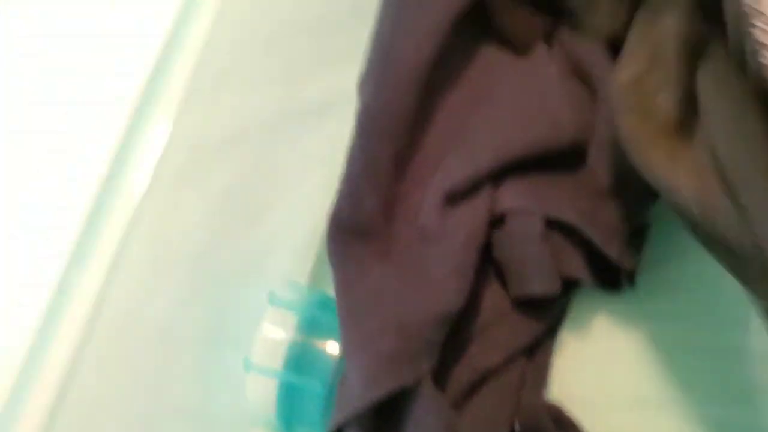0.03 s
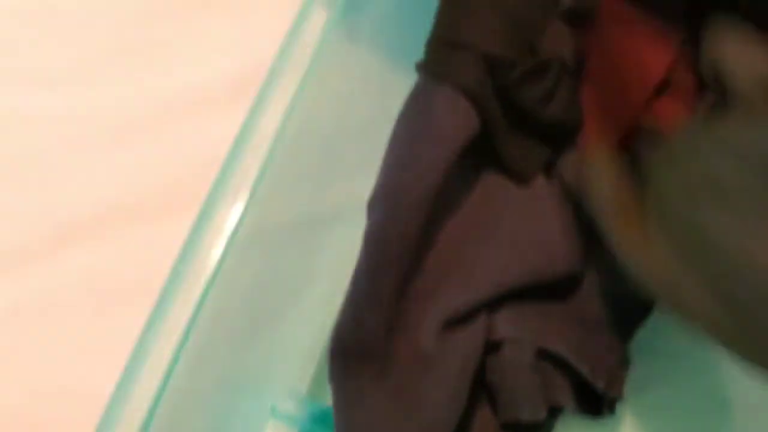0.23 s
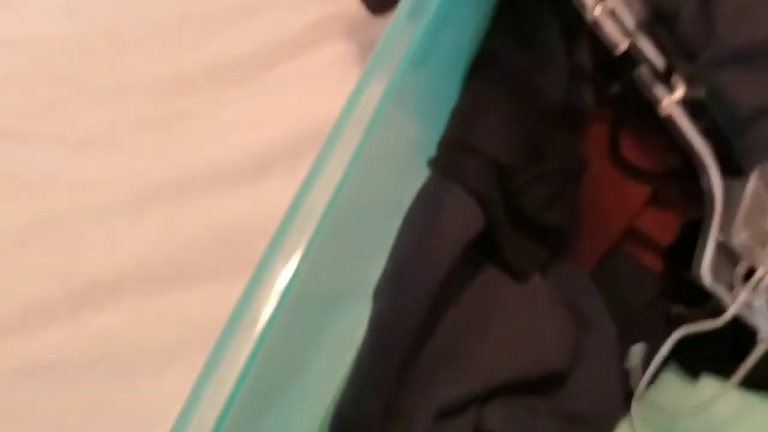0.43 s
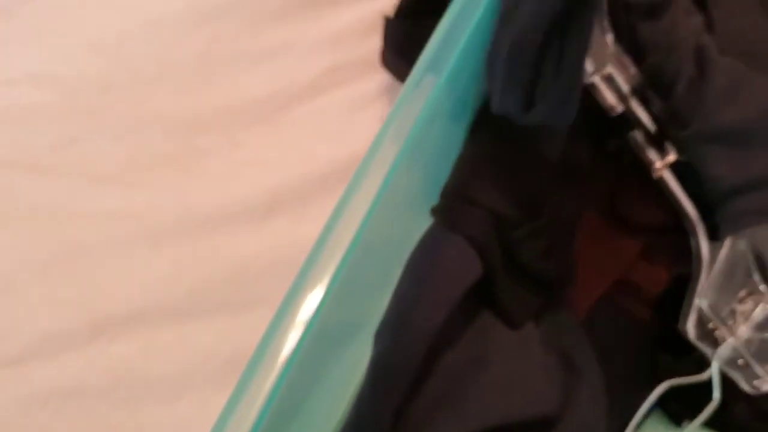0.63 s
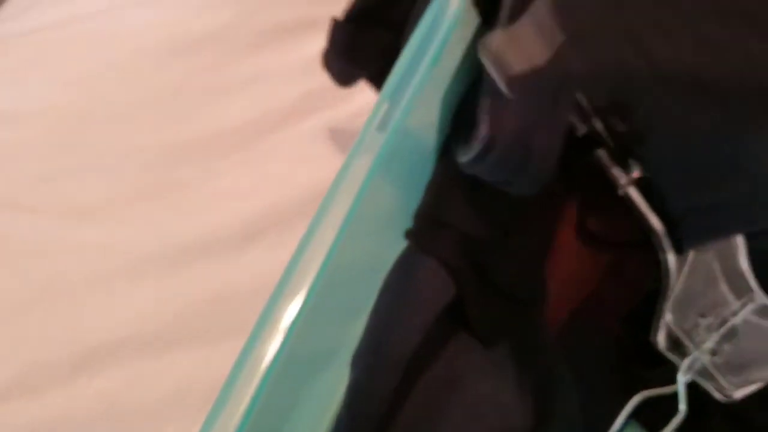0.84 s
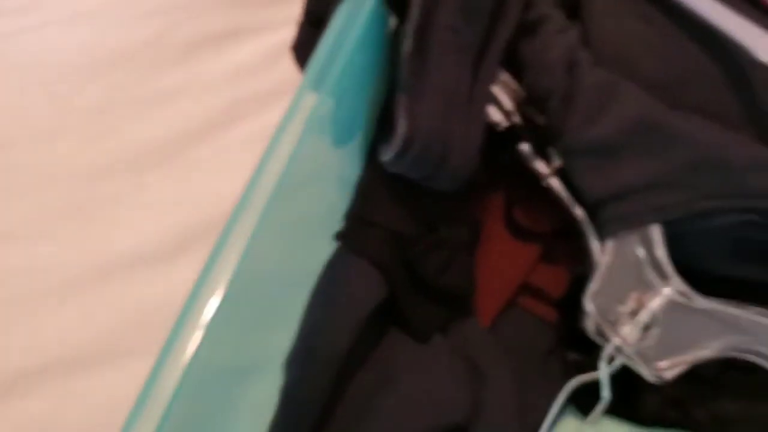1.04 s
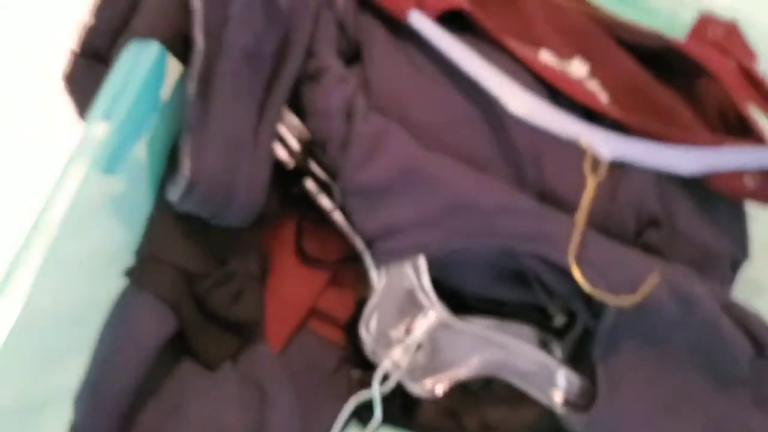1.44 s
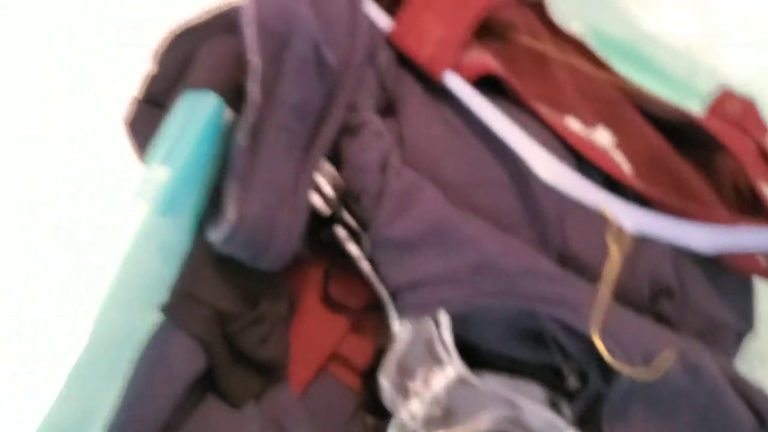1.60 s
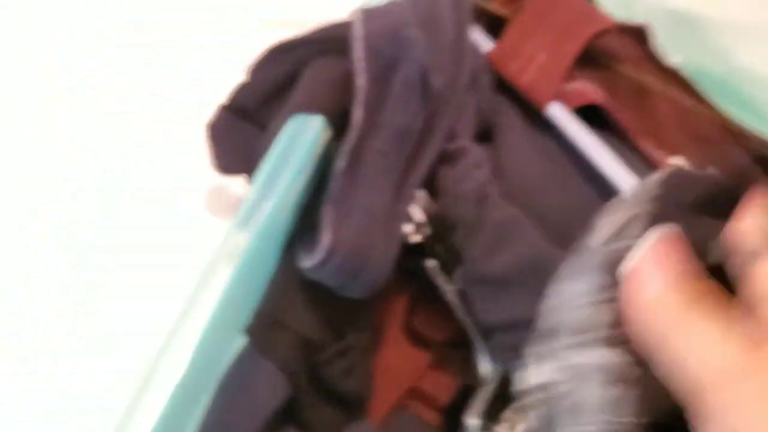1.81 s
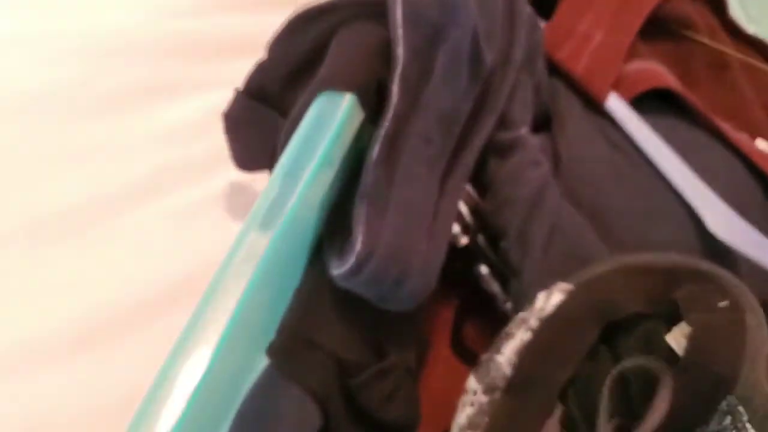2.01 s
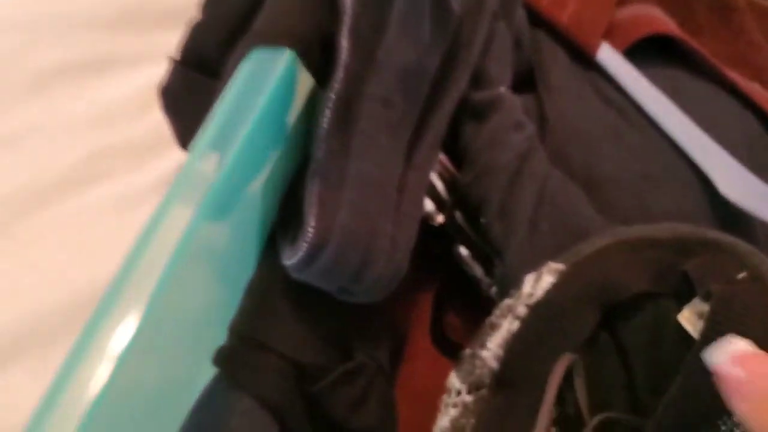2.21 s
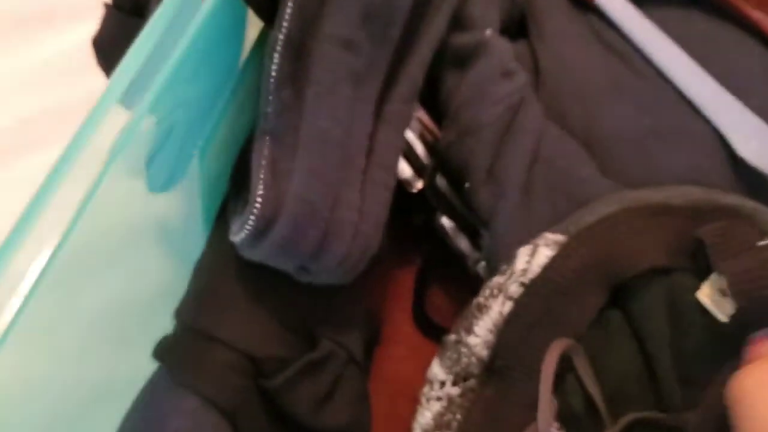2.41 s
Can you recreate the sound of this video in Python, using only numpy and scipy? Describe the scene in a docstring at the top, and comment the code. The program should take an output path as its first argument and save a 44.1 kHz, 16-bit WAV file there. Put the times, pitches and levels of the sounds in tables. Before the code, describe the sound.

Plastic clothes hangers clack and knock against a plastic storage bin, with soft fabric rustling.

```python
"""A quiet room, a stereo pair close to a plastic storage bin, where clothes on hangers are shifted about.
A hook squeaks as it sticks and slips; plastic hangers scrape, snap free and clack together, and their
wire hooks sing on faintly. Struck or bumped, the bin answers with hollow knocks and a thump of its wall.
Fabric rustles softly in between, over a low room hum. The treble sits a little to the left."""
import sys
import numpy as np
from scipy import signal
from scipy.fft import rfft, irfft, next_fast_len
from scipy.io import wavfile
from scipy.ndimage import map_coordinates

SR = 44100
rng = np.random.default_rng(int(sys.argv[2]) if len(sys.argv) > 2 else 0)


def transcribe(u):
    """Save the signal u as a 16-bit wav file named by the first command-line argument.

    u: samples, shape (n,) or (channels, n), limited to [-1, 1]; the rate is SR.
    q: integer samples, one column per channel.
    """
    v = np.clip(np.atleast_2d(u).T, -1, 1)
    q = np.round(v * 32767).astype(np.int16)
    wavfile.write(sys.argv[1], SR, q)


N = 112454
NOW = np.arange(N) / SR  # seconds into the scene
T = np.arange(2 ** 15) / SR  # seconds into one event

# The room's decay. Each row: frequency in Hz, t60 in seconds.
ROOM_DECAY = [(100, .45), (350, .42), (650, 0.78), (1300, 0.29), (2700, 0.38), (6000, 0.18), (14000, 0.18)]
# How alike the two microphones hear noise. Each row: frequency in Hz, correlation.
MIC_LIKENESS = [(35, .7), (120, .96), (400, .94), (900, 0), (2000, .2), (6000, 0), (15000, 0.017)]
# Loudness of the hum with handling rumble, and of dragged cloth. Each row: time in seconds, level in dB.
RUMBLE_LEVEL = [(0, -59.5), (.3, -55.5), (.85, -62.5), (.98, -63.5), (1.25, -62.5), (1.5, -67.5),
                (1.78, -58), (2.1, -57.5), (2.55, -56.5)]
DRAG_LEVEL = [(0, -66), (.09, -65), (.14, -64.5), (.18, -64), (.36, -56.5), (.6, -66.5), (.88, -79),
              (.98, -85), (2.55, -77.5)]

# The colour of each noise. Each row: frequency in Hz, relative spectral level in dB.
RUMBLE_SPECTRUM = [(12, -48), (20, -8.5), (60, 1.5), (86, -7.5), (116, -7.5), (198, -11.5), (216, -18.5),
                   (347, -21), (422, -37), (513, -24), (825, -45), (2530, -37.5), (5230, -40), (12400, -31),
                   (16000, -43.5)]
HISS_SPECTRUM = [(300, 7.5), (1300, -1), (1900, 0), (2500, 13), (3200, -3), (6000, -7.5),
                 (10000, 3), (15500, -14)]
DRAG_SPECTRUM = [(200, -2), (800, -6), (1500, -2), (2700, 7), (4200, 4.5), (6500, 2), (10000, 2),
                 (15000, 1.5)]
SWISH_SPECTRUM = [(300, -15), (1500, -7), (2500, -2), (4000, -4.5), (7000, -0.5), (10000, 2.5), (15500, -9)]
SLIDE_SPECTRUM = [(1000, -38), (2000, -31.5), (2500, -10.5), (2850, -3.5), (3300, -18), (3900, -10),
                  (4250, 1), (4700, -5.5), (5300, -13.5), (9000, -17.5), (15000, -24.5)]
BUMP_SPECTRUM = [(60, 3.5), (220, 8.5), (450, 2.5), (900, -5), (1400, -9), (3000, -6), (10000, -36.5)]
KNOCK_SPECTRUM = [(60, -28), (250, 2), (650, 1.5), (900, -12.5), (1400, -2.5), (1800, -8), (2800, -4.5),
                  (5000, -15.5), (9000, -19), (15000, -21)]
SQUEAK_SPECTRUM = [(200, -16), (800, -27.5), (1500, -20.5), (2800, -2), (5000, -1), (7000, -4.5),
                   (8500, -0.5), (12000, -13), (15500, -21.5)]
SCRAPE_SPECTRUM = [(200, -18.5), (700, -8), (1500, -1.5), (2600, -4.5), (5000, 1.5), (6500, -11.5),
                   (11000, -19.5), (15000, -25)]
SNAP_SPECTRUM = [(200, -5.5), (800, 1.5), (1800, -5.5), (3300, -9), (5000, 3.5), (9000, -3.5), (12000, 1.5),
                 (14500, 2.5), (16000, -11)]
CLACK_SPECTRUM = [(200, 5.5), (1000, -21), (1900, -17), (2700, -1.5), (4000, -1.5), (5000, -16),
                  (9000, -19.5), (15000, -38)]

# How the parts ring. Each row: frequency in Hz, relative level in dB, t60 in seconds.
BIN_MODES = [(182, -28, .2), (243, -15, .09), (448, -27, .09), (546, -30, .09), (595, -26, .09),
             (643, -22, .1), (686, -27, .1), (738, -26, .1), (1275, -20, .022), (1435, -20, .022),
             (2105, -23, .025)]
WIRE_MODES = [(547, -42.5, 1), (734, -47, 0.8), (983, -47, 0.89), (1955, -52.5, 1.9), (2500, -53.5, 2.3),
              (3950, -47.5, 1.6), (4420, -51.5, 1.6)]
HOOK_MODES = [(222, -20.5, .3), (546.8, -33.5, .8), (800, -42.5, .8), (1100, -34.5, .6), (2824, 0.5, .22),
              (2886, 0.5, .18), (2855, -11, .2), (4540, -7, .25), (5260, -19.5, .15), (5690, -15.5, .25),
              (8115, -13.5, .17), (8500, -16.5, .2), (9510, -20, .15)]
EDGE_MODES = [(2300, -13.5, .03), (2720, -6.5, .03), (3680, -6, .03), (4190, 0, 0.04), (5220, -10.5, .03)]
SNAP_MODES = [(2650, -19, .05), (3150, -15, .05), (3474, -7, .05), (3992, -6, .045), (5292, -12, .04),
              (6002, -12, .04), (7850, -14, .035), (9679, -13, .03), (10500, -16, .025), (12800, -16, .025),
              (13660, -11, .025), (14200, -10, .025), (14900, -14, .025)]
CLACK_MODES = [(2704, -6, 0.034), (2870, -32, 0.021), (3010, -39, .04), (3250, -16, 0.051),
               (3510, -10.5, 0.032), (4180, -24, 0.099), (6250, -7, 0.013)]

# Light strokes of fabric, and a hook sliding over cloth or plastic. Each row: middle in seconds, half width in
# seconds, level in dB.
FABRIC_STROKES = [(.87, .06, -80.5), (1.14, 0.052, -77), (1.26, 0.035, -83), (1.539, .05, -74),
                  (1.68, 0.074, -71), (1.818, 0.017, -63), (1.889, 0.097, -67), (2.245, 0.057, -72),
                  (2.49, 0.17, -91)]
HOOK_SLIDES = [(.02, 0.088, -70.5), (.13, 0.021, -51), (1.85, 0.019, -60), (2.12, 0.3, -79)]
# The bin wall bulges under the load. Each row: middle in seconds, level in dB, frequency in Hz.
WALL_FLEXES = [(0.341, -34, 65.7), (2.269, -31, 59)]
# Hard knocks on the bin, and soft bumps of clothes against it.
# Each row: start in seconds, level in dB, treble cutoff in Hz, wall thump in dB, thump pitch in Hz.
BIN_KNOCKS = [(0.401, -4.5, 15880, -23, 95.9), (0.4215, -6.5, 12000, -22.5, 86.9),
              (.461, -17, 14000, -33.5, 81.4), (1.865, -19.5, 550, -35, 87.7), (1.956, -33, 3270, -51, 180),
              (2.240, -48.5, 2000, -51, 109.9), (2.2795, -10, 2940, -25.5, 84.5)]
BIN_BUMPS = [(.670, -35.5, 800, -37.5, 83), (.698, -41, 1400, -46.5, 100), (1.091, -47.5, 600, -44, 109.9),
             (1.098, -44, 650, -44, 210.4), (1.117, -49.5, 700, -45.5, 144),
             (1.8862, -29.5, 386, -50, 107.5), (2.432, -45, 467, -65, 83)]
# A hook or a plastic edge rubs over plastic. Each row: start in seconds, length in seconds, level in dB.
HOOK_SQUEAKS = [(.2062, 0.0065, -12.5), (.2135, .015, -16)]
EDGE_SCRAPES = [(.3435, .013, -39), (.3765, 0.021, -26.5), (.405, 0.012, -25.5)]
# Contacts among the hangers. Each row: start in seconds, level in dB.
PILE_JOSTLES = [(.404, -28)]
HANGER_SNAPS = [(0.4074, -29.5), (0.4199, -26), (0.4803, -5)]
HANGER_CLACKS = [(1.848, -37), (1.8661, -14), (1.956, -34)]
CLIP_TICKS = [(1.805, -43), (1.815, -55), (1.826, -50), (1.889, -43.5), (2.2798, -37), (2.428, -60),
              (2.484, -58.5)]


def amp(db):
    return 10 ** (np.asarray(db) / 20)


def unit_rms(x):
    return x / np.sqrt(np.mean(x ** 2) + 1e-20)


def fade(t, t60):
    """Falls by 60 dB in t60 seconds."""
    return np.exp(-np.log(1000) * t / max(t60, 1e-4))


def along(points, hz):
    """Interpolates (Hz, value) points on a log frequency axis."""
    freqs, values = np.transpose(points)
    return np.interp(np.log(hz + 1), np.log(freqs + 1), values)


def filtered(x, response):
    """Shapes x by a gain that depends on frequency."""
    size = x.shape[-1]
    padded = next_fast_len(size + SR // 4)
    return irfft(rfft(x, padded) * response(np.fft.rfftfreq(padded, 1 / SR)), padded)[..., :size]


def noise(spectrum, size=len(T)):
    """Noise of rms 1 at the two microphones: alike in the bass, unrelated in the treble."""
    def mid_side_gains(hz):
        angle = np.arccos(np.clip(along(MIC_LIKENESS, hz), -1, 1)) / 2
        return amp(along(spectrum, hz)) * [np.cos(angle), np.sin(angle)]
    mid, side = filtered(rng.standard_normal((2, size)), mid_side_gains)
    return unit_rms(np.array([mid + side, mid - side]))


def wobble(rate, size=len(T)):
    """A smooth random curve, rate knots a second."""
    return map_coordinates(rng.standard_normal(size // 8), [np.arange(size) * rate / SR], mode="wrap")


def pulse(spectrum):
    """One minimum-phase click of peak 1 with this spectrum."""
    cepstrum = irfft(along(spectrum, np.fft.rfftfreq(len(T), 1 / SR)) * np.log(10) / 20)
    cepstrum[1:len(T) // 2] *= 2
    cepstrum[len(T) // 2:] = 0
    click = irfft(np.exp(rfft(cepstrum)))
    return click / np.abs(click).max()


def tone(hz, drift=0, lag_s=7e-5):
    """A mode at both microphones; it reaches the left one slightly later."""
    return np.sin(2 * np.pi * hz * (T - np.array([[lag_s], [0]])) + drift)


def ring(modes, chatter_rad, chatter_hz):
    """Free ringing, a little different at each blow; loose parts chatter and blur the pitches."""
    return sum(amp(db + rng.normal(0, 1.5)) * fade(T, t60) * tone(hz, chatter_rad * wobble(chatter_hz))
               for hz, db, t60 in modes)


def swells(rows):
    """Smooth strokes that rise and fall."""
    return sum(amp(db) * np.exp(-((NOW - s) / width) ** 2) for s, width, db in rows)


def add(out, start_s, x):
    i = round(start_s * SR)
    out[:, i:i + len(T)] += x[:, :N - i]


def at_mics(x, left_db, wet_db):
    """Close up, the treble favours the left microphone; the room answers, its treble dying first."""
    tilt_db = np.array([[.5], [-.5]]) * left_db
    direct = filtered(x, lambda hz: amp(tilt_db * hz ** 2 / (hz ** 2 + 900 ** 2)))
    hz, t, bands = signal.stft(noise([(100, 0.0069), (15000, 0)]), SR, nperseg=256)
    decay = np.exp(-np.log(1000) * t / along(ROOM_DECAY, hz)[:, None])
    tail = signal.istft(bands * decay, SR, nperseg=256)[1][:, :len(T)] * (1 - fade(T, 0.057))
    reverb = signal.fftconvolve(direct, tail / np.linalg.norm(tail[0]), axes=1)[:, :N]
    return direct + amp(wet_db) * reverb


def room_tone(hum_hz=117.8, hiss_db=-84):
    """Behind everything: low rumble with a wavering hum line, and faint hiss."""
    hum = np.sin(2 * np.pi * hum_hz * NOW + .7 * wobble(27, N))
    rumble = filtered(noise(RUMBLE_SPECTRUM, N), lambda hz: 1 / (1 + (hz / 900) ** 4))
    level = amp(np.interp(NOW, *np.transpose(RUMBLE_LEVEL)))
    return level * (rumble + hum) + amp(hiss_db) * noise(HISS_SPECTRUM, N)


def fabric(grain_db=2):
    """Cloth drags over the bin and brushes against itself in fine grains, taking hooks along."""
    drag = amp(np.interp(NOW, *np.transpose(DRAG_LEVEL))) * noise(DRAG_SPECTRUM, N)
    strokes = swells(FABRIC_STROKES) * noise(SWISH_SPECTRUM, N)
    slides = swells(HOOK_SLIDES) * noise(SLIDE_SPECTRUM, N)
    grain = amp(grain_db * wobble(300, N))
    return at_mics((drag + strokes + slides) * grain, left_db=3, wet_db=-13.5)


def wire_hooks(snap_db=-12, clack_db=-5, blur_rad=2.5):
    """Many loose hooks shiver after the hangers strike, each pitch a blurred cluster."""
    out = np.zeros((2, N))
    fade_out = 1 - fade(T[::-1], .3)
    for rows, coupling_db in (HANGER_SNAPS, snap_db), (HANGER_CLACKS, clack_db):
        for start, db in rows:
            shiver = sum(amp(level) * fade(T, t60) * tone(hz, blur_rad * wobble(350))
                         for hz, level, t60 in WIRE_MODES)
            add(out, start, amp(db + coupling_db) * shiver * fade_out)
    return out


def wall_flexes(width_s=.011, lag_s=0.002):
    """A slow push of air as the bin wall gives, reaching the right microphone first."""
    t = NOW - np.array([[lag_s], [0]])
    return sum(amp(db) * np.cos(2 * np.pi * hz * (t - s)) * np.exp(-((t - s) / width_s) ** 2)
               for s, db, hz in WALL_FLEXES)


def bin_blows(rows, spectrum, click_db, crunch_db, crunch_t60, rattle_db, rattle_t60,
              thump_t60, thump_rise_s):
    """A click, a crunch, a short rattle and the bin's modes; cloth dulls them, then the wall thumps."""
    out = np.zeros((2, N))
    crunch = amp(crunch_db) * fade(T, crunch_t60)
    rattle = amp(rattle_db) * fade(T, rattle_t60)
    contact = (crunch + rattle) * (1 - fade(T, 0.001))
    click = -amp(click_db) * pulse(spectrum)
    for start, db, cutoff_hz, thump_db, thump_hz in rows:
        body = amp(-1.5) * ring(BIN_MODES, chatter_rad=0.87, chatter_hz=76)
        blow = click + body + contact * noise(spectrum)
        dulled = signal.lfilter(*signal.butter(2, cutoff_hz, fs=SR), blow)
        thump = -tone(thump_hz, lag_s=.0008) * fade(T, thump_t60) * (1 - fade(T, thump_rise_s))
        add(out, start, amp(db) * dulled + amp(thump_db) * thump)
    return out


def hits(rows, modes, spectrum, crack_db, crack_t60, rise_s):
    """Hard plastic contacts: a noisy crack and the brief ringing of any modes given."""
    out = np.zeros((2, N))
    for start, db in rows:
        crack = amp(crack_db) * noise(spectrum) * fade(T, crack_t60)
        ringing = ring(modes, chatter_rad=1.1, chatter_hz=420)
        add(out, start, amp(db) * (ringing + crack) * (1 - fade(T, rise_s)))
    return out


def rubs(rows, modes, spectrum, grit_db, grit_t60, sag_t60, ring_db, rough_rad, release_s):
    """Stick and slip drives the modes during contact, with grit on top; then they ring on weakly."""
    out = np.zeros((2, N))
    for start, length, db in rows:
        drive = fade(T, sag_t60) * fade(np.maximum(T - length, 0), release_s)
        squeal = 0
        for hz, level, t60 in modes:
            envelope = np.maximum(drive, amp(ring_db) * fade(T, t60))
            squeal += amp(level) * tone(hz, rough_rad * wobble(250)) * envelope
        grit = noise(spectrum) * amp(grit_db + 3.4 * wobble(1100)) * drive * fade(T, grit_t60)
        add(out, start, amp(db) * (squeal + grit) * (1 - fade(T, 0.019)))
    return out


def storage_bin():
    """The hollow bin takes hard knocks and padded bumps; the pile jostles after a heavy knock."""
    knocks = bin_blows(BIN_KNOCKS, KNOCK_SPECTRUM, click_db=-6.5, crunch_db=-7.5, crunch_t60=.016,
                       rattle_db=-30, rattle_t60=0.15, thump_t60=0.23, thump_rise_s=0.032)
    bumps = bin_blows(BIN_BUMPS, BUMP_SPECTRUM, click_db=2.5, crunch_db=3.5, crunch_t60=0.036,
                      rattle_db=-24.5, rattle_t60=0.081, thump_t60=0.19, thump_rise_s=0.044)
    jostle = hits(PILE_JOSTLES, [], KNOCK_SPECTRUM, crack_db=-1, crack_t60=0.35, rise_s=.02)
    jostle *= amp(3 * wobble(500, N))
    return at_mics(knocks + jostle, left_db=5, wet_db=-19) + at_mics(bumps, left_db=4.5, wet_db=-19.5)


def hangers():
    """Hangers squeak and scrape, snap as they slip off an edge, and clack; clips and seams tick."""
    squeaks = rubs(HOOK_SQUEAKS, HOOK_MODES, SQUEAK_SPECTRUM, grit_db=-6, grit_t60=.09,
                   sag_t60=.17, ring_db=-33.5, rough_rad=.5, release_s=0.049)
    scrapes = rubs(EDGE_SCRAPES, EDGE_MODES, SCRAPE_SPECTRUM, grit_db=-2, grit_t60=0.34,
                   sag_t60=.2, ring_db=-32.5, rough_rad=.6, release_s=.009)
    snaps = hits(HANGER_SNAPS, SNAP_MODES, SNAP_SPECTRUM, crack_db=0.5, crack_t60=.028, rise_s=.027)
    clacks = hits(HANGER_CLACKS, CLACK_MODES, CLACK_SPECTRUM,
                  crack_db=-8.5, crack_t60=.042, rise_s=.0038)
    ticks = hits(CLIP_TICKS, [], SWISH_SPECTRUM, crack_db=-1.5, crack_t60=.0092, rise_s=.0013)
    return (at_mics(squeaks, left_db=1.5, wet_db=-13)
            + at_mics(scrapes, left_db=3, wet_db=-14.5)
            + at_mics(snaps, left_db=3.5, wet_db=-14.5)
            + at_mics(clacks + ticks, left_db=4.5, wet_db=-18))


def scene():
    return storage_bin() + wall_flexes() + hangers() + wire_hooks() + fabric() + room_tone()


def record(dry):
    """The recorder: a low cut at 27 Hz and a steep band limit at 15950 Hz."""
    low_cut = signal.butter(2, 27, "high", fs=SR, output="sos")
    return filtered(signal.sosfilt(low_cut, dry), lambda hz: 1 / (1 + (hz / 15950) ** 160))


dry = scene()
out = record(dry)
transcribe(out)
```